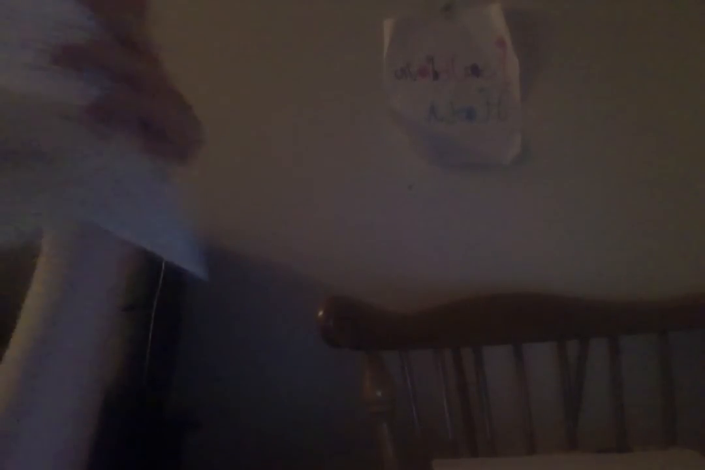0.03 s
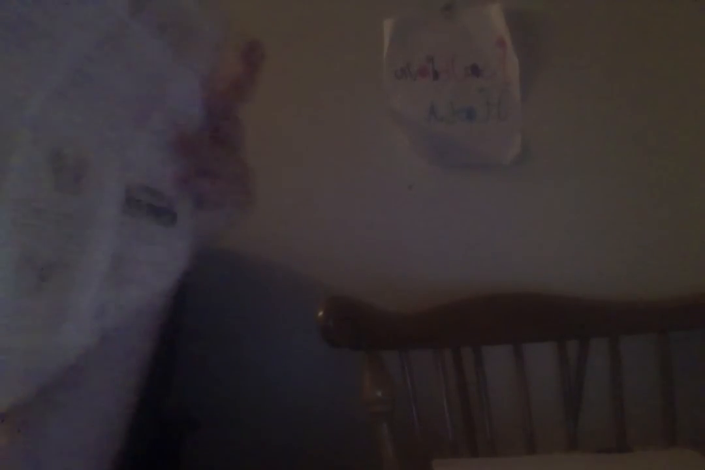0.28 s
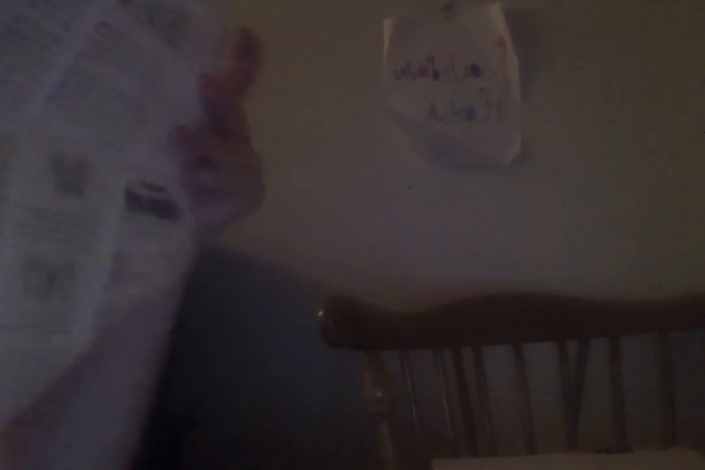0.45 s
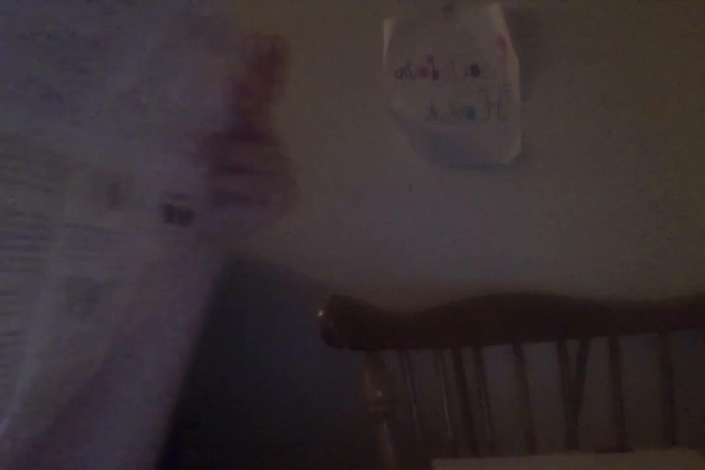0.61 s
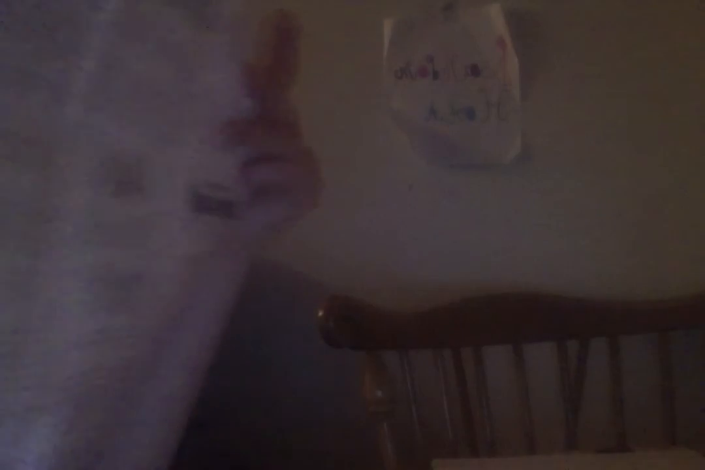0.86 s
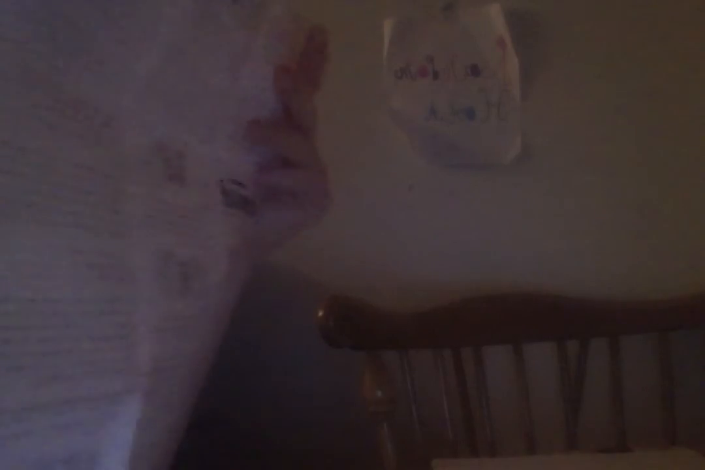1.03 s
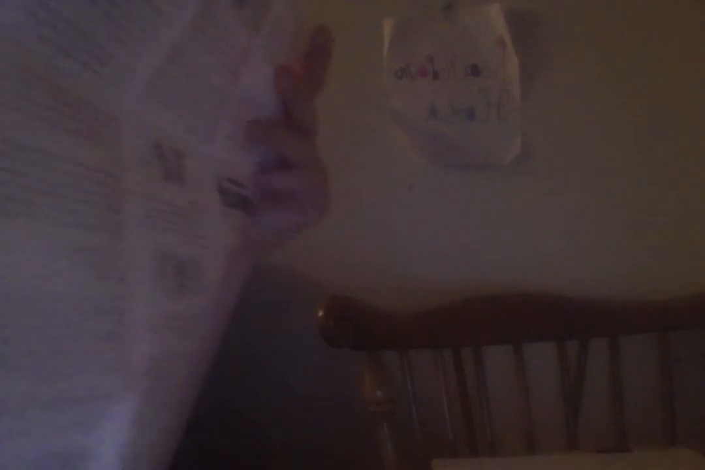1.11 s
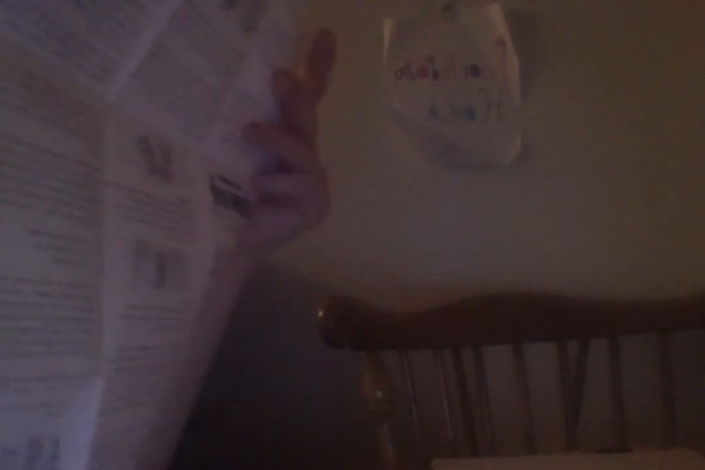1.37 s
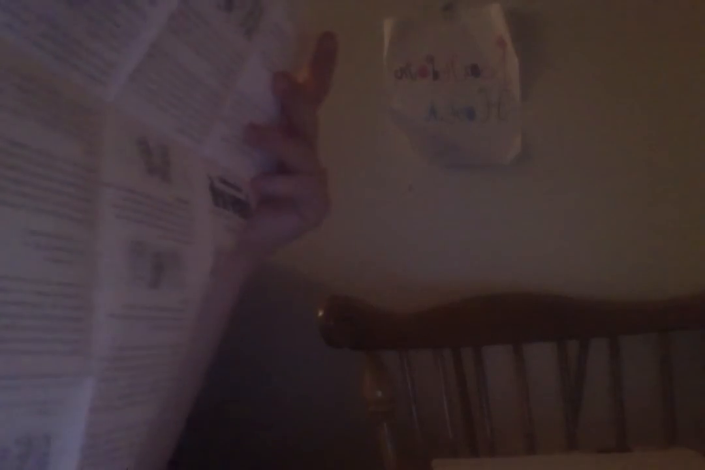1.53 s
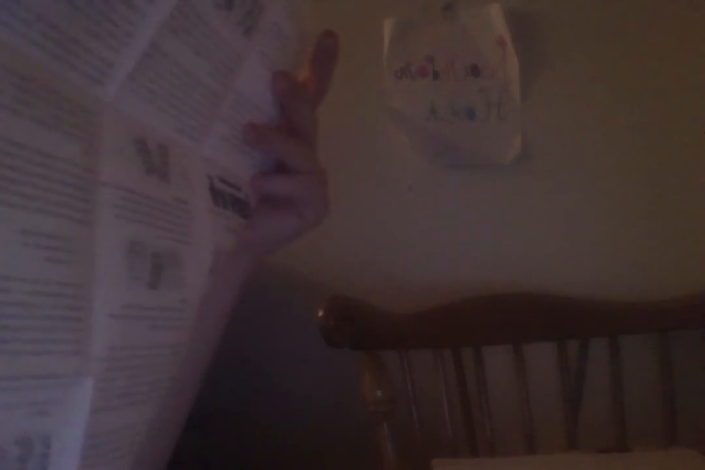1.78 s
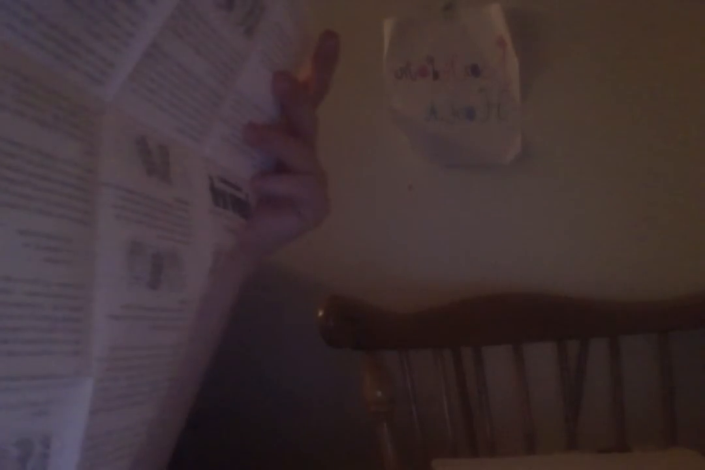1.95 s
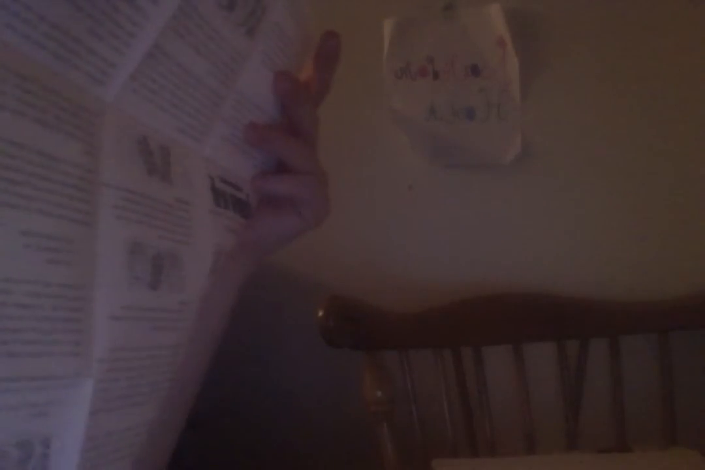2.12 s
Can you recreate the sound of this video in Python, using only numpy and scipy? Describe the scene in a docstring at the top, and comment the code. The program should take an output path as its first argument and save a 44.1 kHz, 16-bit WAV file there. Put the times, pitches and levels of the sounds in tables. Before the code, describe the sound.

Close, dry paper handling in a small quiet room: large thin pages hiss and crackle as they unfold, creases snap sharply, the sheet flops, then brief quiet scuffs follow as it settles.

```python
"""A newspaper is lifted and unfolded close to a small microphone in a quiet room.
Its pages slide over each other with a grainy hiss (friction noise), while creases snap through and
the slack sheet flops (dispersive pulses that set the microphone's body ringing).
Then the open sheet rubs softly as it settles (resonant friction), with brief scuffs as it sags.
A steady room hush lies under it all, and short reflections follow the paper."""
import sys
import numpy as np
from scipy import signal
from scipy.fft import rfft, irfft
from scipy.io import wavfile
from scipy.ndimage import uniform_filter1d, map_coordinates

SR = 44100
rng = np.random.default_rng(int(sys.argv[2]) if len(sys.argv) > 2 else 0)


def to_wav(s):
    """Save 16-bit WAV."""
    ch = np.atleast_2d(s).T  # columns
    pcm = np.round(np.clip(ch, -1, 1) * 32767)  # PCM
    wavfile.write(sys.argv[1], SR, pcm.astype(np.int16))


N = 97020
TIME = np.arange(N) / SR
PULSE_HZ = np.linspace(0, SR / 2, 2049)  # frequency grid of the pulses
GRAINS_PER_S = 5600  # slips per second in hiss, fizz, settling and scuffs
ECHO_SHARE = 0.377  # strength of an echo of a crack or flop


def amp(db):
    """Decibel law: level in dB to amplitude gain."""
    return 10 ** (np.asarray(db) / 20)


def unit(x):
    """Normalisation of mean power: scales to rms 1."""
    return x / np.sqrt(np.mean(x ** 2) + 1e-20)


def read(points, hz):
    """Interpolation on a log-frequency axis, as pitch is heard."""
    f, value = np.transpose(points)
    return np.interp(np.log(hz + 1), np.log(f), value)


def level(rows, axis=1):
    """Envelope: gain over time from one dB column, falling 60 dB per second further outside it."""
    rows = np.array(rows)
    outside_s = np.maximum(rows[0, 0] - TIME, 0) + np.maximum(TIME - rows[-1, 0], 0)
    return amp(np.interp(TIME, rows[:, 0], rows[:, axis]) - 60 * outside_s)


def colour(x, points):
    """Linear filtering: gives a steady sound a spectral colour, at rms 1."""
    gain = amp(read(points, np.fft.rfftfreq(N, 1 / SR)))
    return unit(irfft(rfft(x) * gain, N))


def band(hz, centre_hz, octaves):
    """Band-limited excitation: a bell-shaped spectrum around one pitch."""
    return np.exp(-np.log2((hz + 1) / centre_hz) ** 2 / octaves ** 2)


def add(mix, s, sound):
    """Superposition: adds a sound at time s."""
    part = mix[max(round(s * SR), 0):][:len(sound)]
    part += sound[:len(part)]


def resonate(x, hz, width):
    """Simple resonance: one damped mode with gain 1 at its peak."""
    return signal.lfilter(*signal.iirpeak(hz, hz / width, SR), x)


def tail(x, t60, start_s):
    """Diffuse reverberation: dense random reflections of energy 1, each band with its own decay."""
    hz, t, z = signal.stft(rng.choice([-1., 1.], SR // 2), SR, nperseg=128)
    decay = amp(-60 * t / read(t60, hz)[:, None])
    taps = signal.istft(z * decay)[1]
    # silent up to start_s, full strength from twice that delay
    taps *= np.clip(np.arange(len(taps)) / SR / abs(start_s) - 1, 0, 1)
    return signal.fftconvolve(x, taps / np.linalg.norm(taps))[:N]


def friction(per_s):
    """Stick-slip friction: tiny slips of uneven size over a smooth rub."""
    spread_db, smooth_share = 3.5, 0.59  # the share is of power
    sizes = amp(spread_db * np.minimum(rng.exponential(1, N), 5))
    slips = sizes * rng.choice([-1, 1], N) * (rng.random(N) < per_s / SR)
    smooth = rng.standard_normal(N)
    return np.sqrt(1 - smooth_share) * unit(slips) + np.sqrt(smooth_share) * smooth


def pulse(gain, delay_s=0):
    """Bending-wave dispersion: a causal pulse with this spectrum whose bass arrives late."""
    bend_lag_s = 0.00019  # lag at 1 kHz; it falls as one over the root of frequency
    hz = PULSE_HZ
    # minimum phase, from the Hilbert transform of the mirrored log gain
    log_gain = np.log(np.maximum(gain, 1e-5))
    mirrored_log = np.r_[log_gain, log_gain[-2:0:-1]]
    spectrum = np.exp(np.conj(signal.hilbert(mirrored_log)))[:len(hz)]
    # phase lag is the integral of delay over frequency
    bend_cycles = 2 * bend_lag_s * np.sqrt(1000 * hz)
    delay_cycles = np.cumsum(delay_s + 0 * hz) * hz[1]
    lag = 2 * np.pi * (bend_cycles + delay_cycles)
    return irfft(spectrum * np.exp(-1j * lag))[:len(hz)]


def room_hush():
    """Stationary room noise: coloured random pressure with one hollow resonance."""
    # colour of the quiet room: [frequency_hz, gain_db]
    hush_colour = [(25, -49), (150, -18.5), (260, -5.5), (1750, -7.5), (2100, -7.5), (2650, -8.5),
                   (3200, -14), (4600, -16), (6500, -34.5), (16000, -32)]
    hush = colour(rng.standard_normal(N), hush_colour)
    return amp(-73.5) * unit(hush + resonate(hush, hz=1690, width=70))


def room_reflections(paper):
    """Room reverberation: the treble of the paper dies sooner than the middle."""
    # decay of the room: [frequency_hz, t60_s]
    room_t60 = [(150, 0.14), (700, .22), (15000, 0.045)]
    return amp(-20) * tail(paper, room_t60, start_s=.005)


def scuffs():
    """Resonant friction: short slip runs of the sagging sheet, each through one broad resonance."""
    # brief scuffs: [start_s, length_s, level_db, pitch_hz]
    scuff_rows = [(1.244, 0.068, -63.5, 2410), (1.376, 0.095, -59, 1640), (1.533, 0.027, -62, 1422),
                  (1.522, 0.088, -62, 2640), (1.641, 0.0615, -59.5, 1553), (1.734, 0.016, -56.5, 1515),
                  (1.843, 0.027, -64.5, 1610)]
    width_hz, edge_s = 130, 0.0036  # width of each of two passes; fade at either end
    out = np.zeros(N)
    for s, length_s, db, hz in scuff_rows:
        rub = friction(GRAINS_PER_S)
        for _ in range(2):
            rub = resonate(rub, hz, width_hz)
        to_edge_s = np.minimum(TIME - s, s + length_s - TIME)
        out += amp(db) * unit(rub) * np.clip(to_edge_s / edge_s, 0, 1)
    return out


def patchy(x, depth_db):
    """Random modulation: contact comes and goes, so bands swell and fade some tens of times a second."""
    z = signal.stft(x, nperseg=256)[2]
    field = uniform_filter1d(rng.standard_normal(z.shape), size=4, axis=0)  # across frequency
    field = uniform_filter1d(field, size=8, axis=1)  # across time
    return signal.istft(z * amp(depth_db * unit(field)))[1][:N]


def settling():
    """Resonant friction: a soft, hollow, uneven rub as the open sheet comes to rest."""
    # level of the rub: [time_s, level_db]
    settle_level = [(.6, -68.5), (.8, -56.5), (1.1, -56), (1.2, -61), (1.27, -55.5), (1.46, -60),
                    (1.8, -65.5), (2, -71), (2.2, -70.5)]
    # its colour before the resonances: [frequency_hz, gain_db]
    settle_colour = [(50, -31.5), (170, -20.5), (470, -7), (740, 0.5), (1720, 1), (2150, -11.5),
                     (2600, -10.5), (5500, -19), (12000, -43)]
    # resonances added to it: [pitch_hz, width_hz, gain_db]
    settle_rings = [(1735, 45, 1.5), (2637, 170, 5.7)]
    rub = colour(friction(GRAINS_PER_S), settle_colour)
    rings = sum(amp(db) * resonate(rub, hz, width) for hz, width, db in settle_rings)
    return level(settle_level) * unit(patchy(rub + rings, depth_db=2.5))


def mirrored(x):
    """Comb interference: the moving pages reflect with drifting delays, so the colour keeps shifting."""
    share, relative_drift = 0.25, .05
    out = x.copy()
    for sign in (1, -1, 1):
        drift = signal.resample(rng.standard_normal(20), N)
        delay_s = .003 * rng.uniform(0.45, 2) * (1 + relative_drift * drift)
        out += sign * share * map_coordinates(x, [(TIME - delay_s) * SR], order=3)
    return out / np.sqrt(1 + 3 * share ** 2)


def sliding():
    """Sliding friction: page rubs on page with a low flutter, a hiss and a fine fizz."""
    # three moves, lifting, opening and spreading: [time_s, flutter_db, hiss_db, fizz_db]
    moves = [(0.06, -73.5, -75, -91), (0.085, -63, -75.5, -79.5), (0.1, -42, -42.5, -39),
             (0.118, -49.5, -59, -53.5), (0.14, -48, -55.5, -52), (0.183, -56, -49.5, -47.5),
             (0.197, -37, -42.5, -44), (0.207, -34, -26, -36), (0.226, -34.5, -28.5, -29),
             (0.245, -36.5, -41, -36), (0.283, -36, -38.5, -33), (0.305, -55, -44, -43),
             (0.34, -55.5, -46, -44.5), (0.385, -66, -52.5, -45.5), (0.41, -67.5, -63, -59)] + [(0.435, -62.5, -63.5, -67), (0.47, -55.5, -48, -45), (0.49, -38, -42.5, -44.5),
                            (0.52, -50, -52.5, -51), (0.539, -45.5, -42, -40.5), (0.58, -59.5, -46.5, -43),
                            (0.605, -50.5, -55, -54), (0.647, -76, -53.5, -51.5), (0.663, -64, -75.5, -69),
                            (0.711, -103, -69.5, -68)] + [(0.744, -36.5, -77, -90), (0.772, -69, -48, -52),
                                           (0.818, -52.5, -54.5, -56), (0.863, -71.5, -45, -47),
                                           (0.918, -61, -60.5, -61), (0.95, -75, -51.5, -52),
                                           (0.985, -73.5, -52, -53.5), (1.02, -54, -45, -49.5),
                                           (1.045, -44.5, -54, -50.5), (1.062, -54.5, -55, -56),
                                           (1.086, -82, -72.5, -79), (1.222, -68.5, -64.5, -70),
                                           (1.3, -70.5, -83.5, -86)]
    # colours of the three layers before the reflections: [frequency_hz, gain_db]
    flutter_colour = [(30, -35), (70, -5), (150, -3.5), (280, 2.5), (850, -1), (1650, -3.5), (2200, -7),
                      (3200, -14.5), (6000, -34)]
    hiss_colour = [(1200, -21), (2200, -9.5), (3100, -4), (4200, 2.5), (6000, 2), (7700, 5), (9300, -1.5),
                   (12000, -25.5)]
    fizz_colour = [(6500, -29), (9200, -2), (11000, -0.5), (12800, -2), (14200, 4), (15500, 1.5),
                   (16500, -11.5)]
    flutter = level(moves, axis=1) * colour(friction(per_s=590), flutter_colour)
    hiss = level(moves, axis=2) * colour(friction(GRAINS_PER_S), hiss_colour)
    fizz = level(moves, axis=3) * colour(friction(GRAINS_PER_S), fizz_colour)
    return mirrored(flutter + hiss + fizz)


def flops():
    """Bending pulses: the slack sheet flops, and each flop echoes off the edge of the sheet."""
    # flops, levels relative: [start_s, level_db, pitch_hz]
    flop_rows = [(0.1135, -1.5, 1010), (.1465, 7, 380), (.1503, -1, 890), (.416, 0, 520), (.478, 3.5, 526),
                 (0.5708, -1, 600), (0.5817, 0.5, 584), (0.718, 0, 597), (0.905, -8, 1070),
                 (1.0054, -5.5, 840), (1.034, -2, 662), (1.253, -10.5, 607)]
    out = np.zeros(N)
    for s, db, pitch_hz in flop_rows:
        flop = pulse(amp(db) * band(PULSE_HZ, pitch_hz, octaves=0.78))
        add(out, s, flop)
        add(out, s + .0074 * rng.uniform(0.71, 1.315), ECHO_SHARE * flop)
    return out


def wrinkles():
    """Impulsive buckling: small wrinkles tick, each a broad pulse at a random pitch."""
    # ticks, levels relative: [start_s, level_db]
    wrinkle_rows = [(.2113, 2), (0.214, 1), (0.2219, -4), (.2283, -7), (0.2816, -7), (1.05, -18)]
    out = np.zeros(N)
    for s, db in wrinkle_rows:
        pitch_hz = 4160 * 2 ** rng.uniform(-.7, .7)  # spread in octaves
        add(out, s, pulse(amp(db) * band(PULSE_HZ, pitch_hz, octaves=2.4)))
    return out


def thump(hz, patch_hz):
    """Volume displacement: spectrum of air pushed by a flipping patch that rings at its own pitch."""
    # modes of a patch, scaled by its stiffness: [multiple_of_pitch, boost_db, t60_s]
    patch_modes = [(.25, 4, .018), (.37, 9.5, .04), (.61, 3.5, .025), (1, 12.5, .018)]
    stiffness = (patch_hz / 1700) ** 3  # patches pitched below 1700 Hz are slack and ring less
    ring_power = 0
    for ratio, db, t60 in patch_modes:
        detuning = 2 * np.pi * (hz - ratio * patch_hz) * t60 / np.log(1000)
        ring_power = ring_power + amp(db) ** 2 / (1 + detuning ** 2)
    ring = np.sqrt(1 + stiffness * ring_power)
    bass_cut = 1 / np.hypot(1, (90 / (hz + 1)) ** 3)
    low_slope = hz / np.hypot(hz, 105)
    return bass_cut * ring * low_slope / np.hypot(1, (hz / patch_hz) ** 5)


def snaps():
    """Snap-through buckling: a crease flips with a thump and a crack that echoes off the sheet's edge."""
    # snaps, levels relative; width is that of the crack, run the running time of the fold:
    # [start_s, thump_db, crack_db, crack_hz, width_octaves, patch_hz, run_s]
    snap_rows = [(0.0947, -19.5, -12, 11000, 1.7, 1520, 0.00065),
                 (0.1656, -23.5, -10, 5100, .65, 1480, 0.00079), (0.2005, 4, -1.5, 6100, 3, 1720, 0.00052),
                 (0.2082, -6.5, -1.5, 7000, .6, 1260, 0.0018), (0.2739, 0.5, 4, 8900, 2.2, 1550, 0.00069),
                 (0.4473, 5.5, -4, 3400, .9, 1200, 0.00073), (0.4954, 9.5, 13, 4800, .8, 1700, .0011),
                 (0.4983, -6, 2, 5080, 1.65, 1690, 0.0007), (0.5254, -16, -2.5, 3900, 1.1, 1490, 0.0015),
                 (0.7395, 6, 5.5, 5700, .75, 1380, 0.00057), (1.0345, -6, -14, 3500, .5, 1470, 0.00058)]
    hz, raggedness = PULSE_HZ, 0.65  # uneven running of a fold, relative to its running time
    out = np.zeros(N)
    for s, thump_db, crack_db, crack_hz, octaves, patch_hz, run_s in snap_rows:
        unevenness = abs(signal.resample(rng.standard_normal(20), len(hz)))
        sweep_s = run_s / (1 + (hz / crack_hz) ** 4) + raggedness * run_s * unevenness
        # a crack falls away steeply above 2.27 times its pitch
        treble_cut = 1 / np.hypot(1, (hz / (2.27 * crack_hz)) ** 6)
        crack = amp(crack_db) * band(hz, crack_hz, octaves) * treble_cut
        blow = np.hypot(amp(thump_db) * thump(hz, patch_hz), crack)
        add(out, s, pulse(blow, sweep_s))
        add(out, s + .0017, ECHO_SHARE * pulse(crack, sweep_s))
    return out


def buckles():
    """Modal excitation: snaps, wrinkles and flops ring the microphone's body, then scatter."""
    # ringing of the microphone's body under every blow: [pitch_hz, boost_db, t60_s]
    body_modes = [(3850, 2, .014), (4480, 1, 0.0059)]
    # decay of the scattered sound: [frequency_hz, t60_s]
    scatter_t60 = [(200, 0.037), (4000, 0.022), (12000, 0.0054)]
    blows = snaps() + wrinkles() + flops()
    ringing = np.zeros(N)
    for hz, db, t60 in body_modes:
        width_hz = np.log(1000) / np.pi / t60
        ringing += amp(db) * resonate(blows, hz, width_hz)
    direct = amp(-2.5) * (blows + ringing)
    return direct + amp(-11) * tail(direct, scatter_t60, start_s=.0009)


def scene():
    """Superposition: the paper, its reflections in a small room and the room's hush."""
    paper = scuffs() + settling() + sliding() + buckles()
    return (room_hush() + room_reflections(paper) + paper)[None]


def record(dry):
    """Band limitation: the recorder passes what lies below 16 kHz."""
    low_pass = signal.firwin(401, 16000, window=("kaiser", 8), fs=SR)
    return signal.oaconvolve(dry, low_pass[None], "same")


dry = scene()
out = record(dry)
to_wav(out)
```